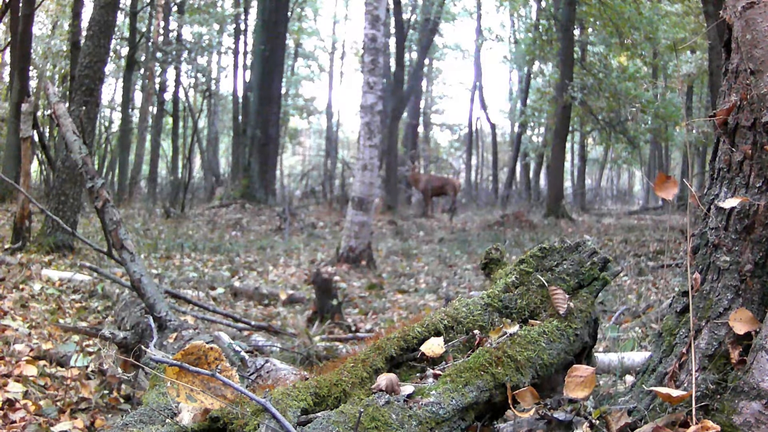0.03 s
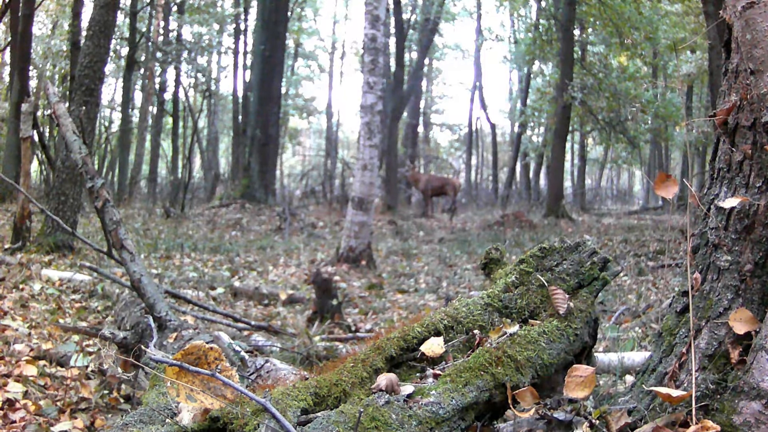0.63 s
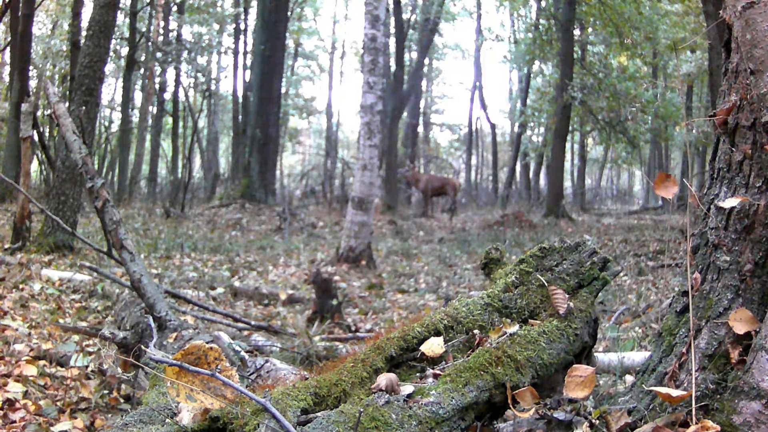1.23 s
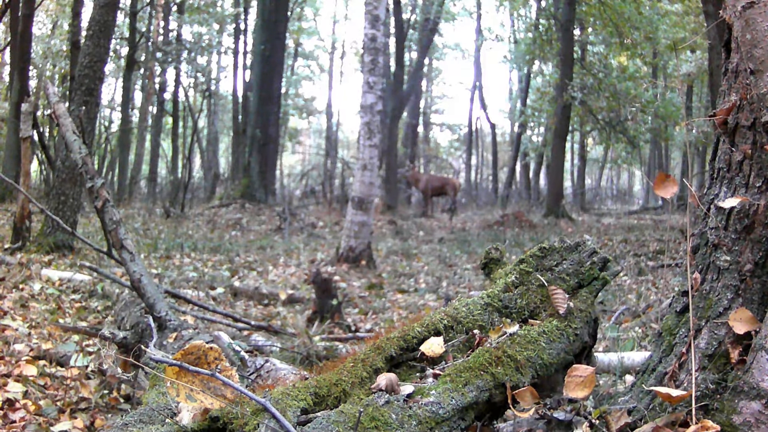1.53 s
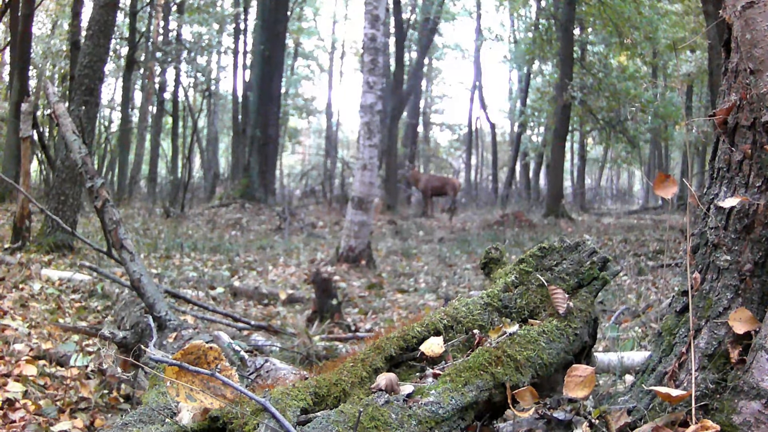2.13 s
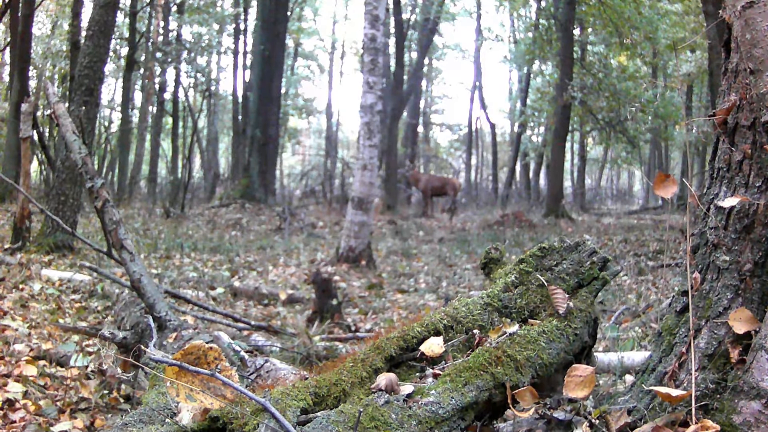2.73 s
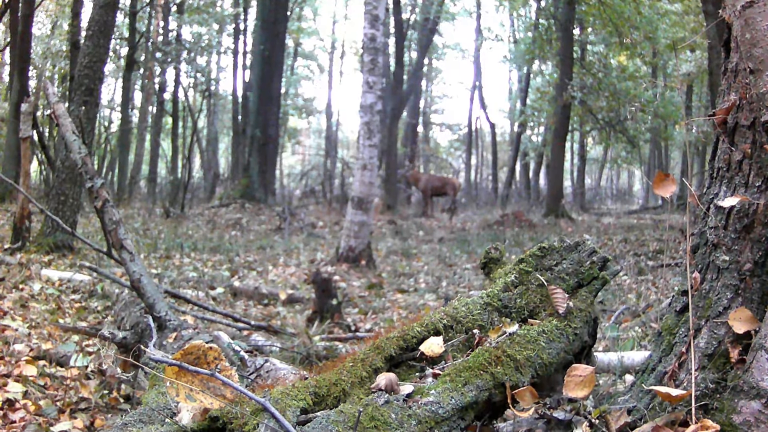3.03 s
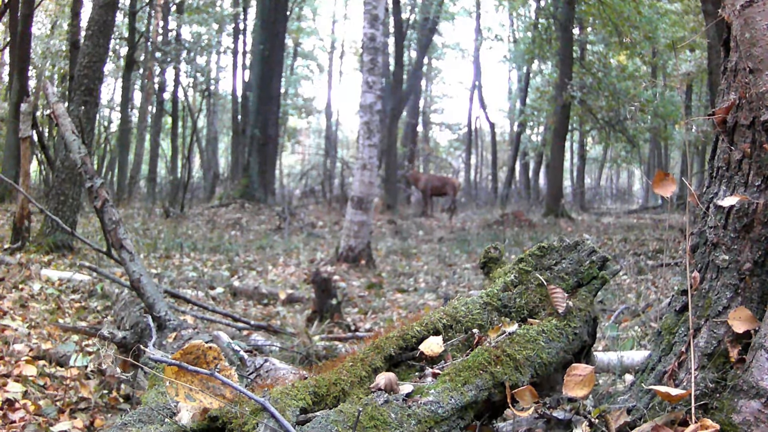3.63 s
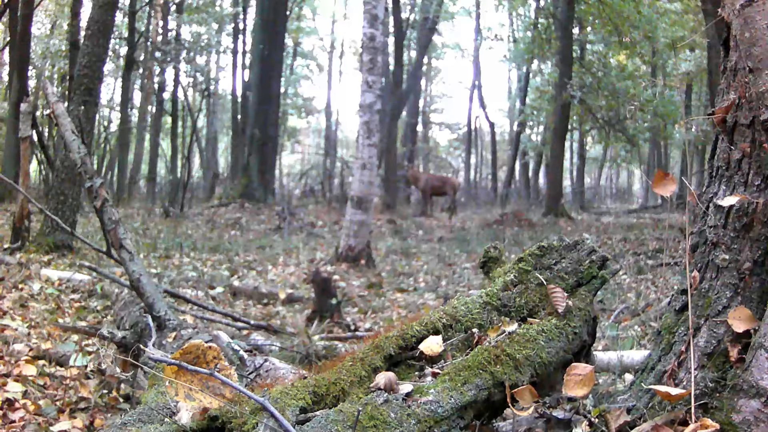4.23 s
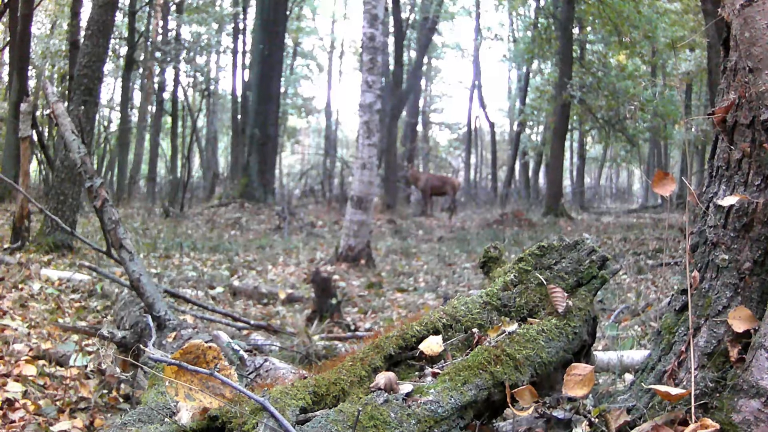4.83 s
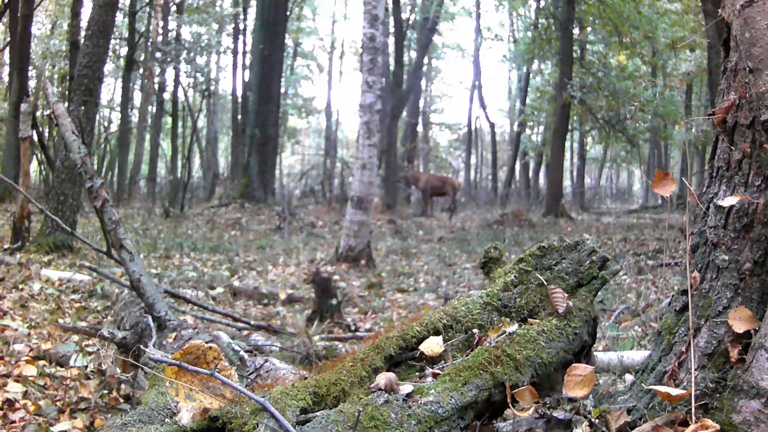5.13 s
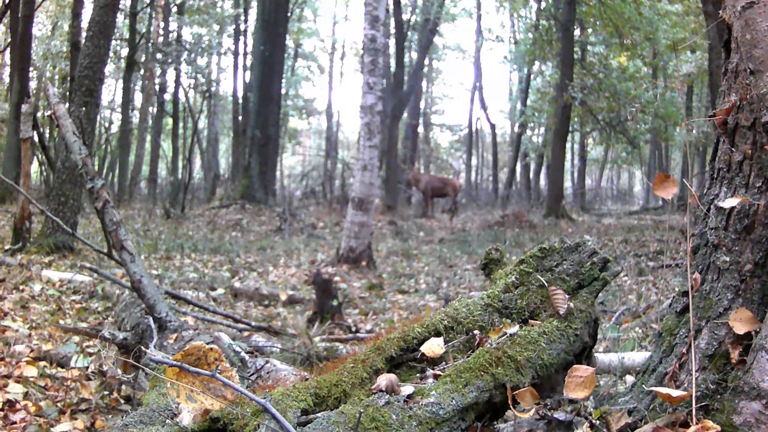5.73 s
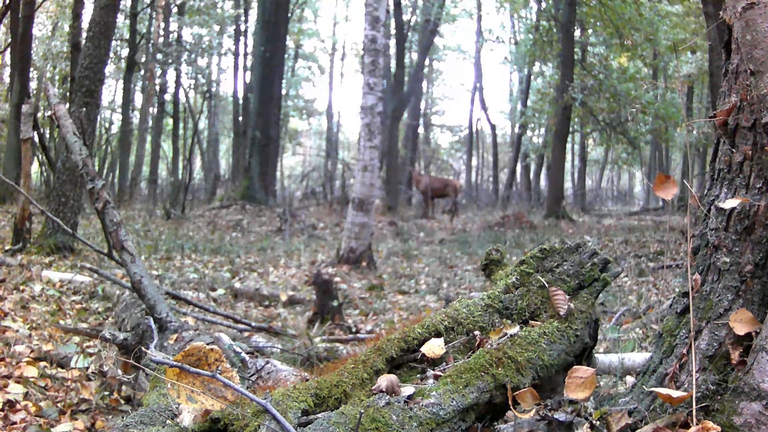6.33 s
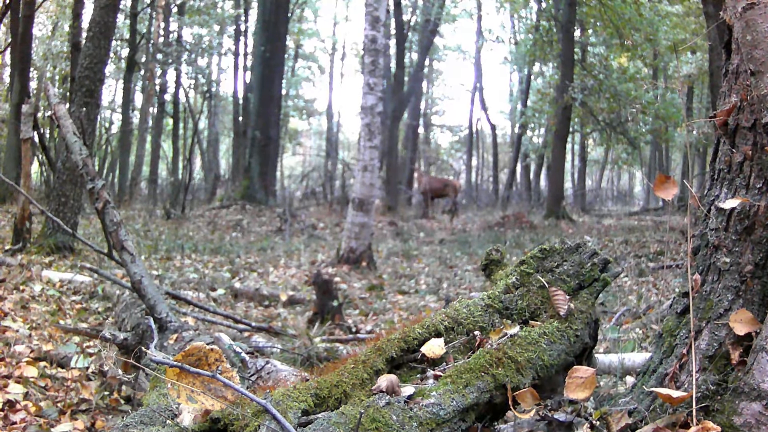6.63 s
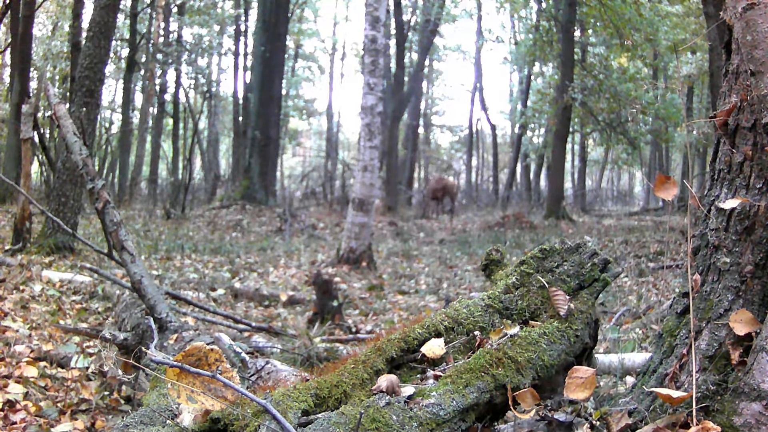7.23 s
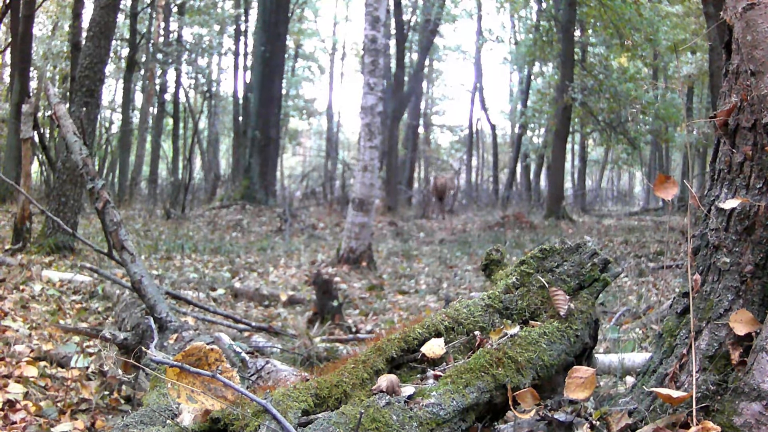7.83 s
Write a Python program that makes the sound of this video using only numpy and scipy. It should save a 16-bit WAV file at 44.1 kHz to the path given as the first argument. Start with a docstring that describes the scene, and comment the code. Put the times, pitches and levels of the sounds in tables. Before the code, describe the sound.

In still woodland, a distant stag gives a long, deep roar and then a shorter, rougher one, each with a short echo. Soft bumps on the camera body come as the second call fades. After a lull with one small dry snap, five sharp, close taps ring the housing, the first the loudest. Under everything the microphone picks up low air, fine hiss and the camera's faint, fluttering motor hum.

```python
"""Stag roaring in the forest

A red deer stag roars twice among distant trees: one long, level call, then a short, hoarser one that
arches in pitch. Its vocal folds pulse through a throat that shifts posture, and the trunks scatter it.
A faint click falls in the second roar. Light bumps and later five sharp taps ring the camera's housing,
with a few faint snaps. Its tape drive hums and ticks throughout, over still air and a soft hiss."""
import sys
import numpy as np
from scipy import signal
from scipy.fft import rfft, irfft, next_fast_len
from scipy.io import wavfile
from scipy.ndimage import uniform_filter1d, map_coordinates

SR = 44100
rng = np.random.default_rng(int(sys.argv[2]) if len(sys.argv) > 2 else 0)


def digitize_waveform(pressure):
    """Quantize a signal to 16-bit integers and store it at the path in sys.argv[1].

    Rows of a 2-D input are taken as channels; values are limited to [-1, 1].
    """
    field = np.atleast_2d(pressure).T
    bounded = np.clip(field, -1, 1)
    quanta = np.round(bounded * 32767).astype(np.int16)
    wavfile.write(sys.argv[1], SR, quanta)


N = 352800
TIME = np.arange(N) / SR

# Pitch line of each roar: time_s, pitch_hz
LONG_ROAR_PITCH = [(0, 92.26), (.53, 80.9), (.75, 83.6), (.89, 82.65), (1, 84.1), (1.11, 86.6),
                   (1.25, 88.7), (1.51, 89.26), (1.7, 83.4)]
SHORT_ROAR_PITCH = [(2.14, 82.66), (2.3, 92.8), (2.46, 98.15), (2.485, 102.2), (2.53, 100.5), (2.67, 89.85),
                    (2.8, 83.5)]
# Throat resonances in five postures: centre_hz, width_hz, gain_db
THROAT_STRETCHED = [(520, 53, -3), (875, 79, 3.5), (1250, 71, 3.5), (1455, 71, 0), (1690, 73, 0.5),
                    (2110, 200, -15), (2506, 120, -8), (2865, 160, -8)]
THROAT_HELD = [(500, 60, -11.5), (940, 74, 6), (1276, 75, 6), (1545, 83, -4.5), (1739, 50, -1.5),
               (2135, 200, -8.5), (2540, 100, -9), (2760, 70, -9.5), (2970, 70, -13.5)]
THROAT_OPENING = [(1260, 190, -0.5), (1490, 160, 0), (1715, 110, 2), (2070, 120, 0.5), (2600, 180, -21),
                  (2760, 170, -8), (3100, 180, -15)]
THROAT_FULL = [(970, 150, -8), (1320, 190, 0), (1623, 60, 3), (2015, 140, 2), (2370, 190, -16),
               (2750, 300, -12.5), (3080, 180, -13)]
THROAT_CLOSING = [(970, 130, -5), (1330, 120, 3), (1610, 80, 1), (1930, 150, 3), (2300, 160, -11.5),
                  (2720, 220, -13), (3020, 180, -15)]
# Crossfades from each posture to the next: start_s, end_s
POSTURE_FADES = [(.4, .65), (1.8, 2), (2.44, 2.49), (2.52, 2.63)]

def stag(jitter=0.0003, rough_jitter=.012, shimmer_db=.6, chest_db=-2):
    """Vocal folds snap shut once a cycle; when hoarse they stumble and let through turbulent puffs."""
    pitch = np.interp(TIME, *np.transpose(LONG_ROAR_PITCH + SHORT_ROAR_PITCH))
    loudness, rough = roar_shape()
    hoarse = np.clip(rough, 0, 1) ** 2.5
    cycles = np.cumsum(pitch * (1 + (jitter + rough_jitter * hoarse) * wobble(70))) / SR
    offset = cycles % 1 - .5
    pulses = unit(np.sinc(offset / pitch * SR / 4) * np.cos(np.pi * offset) ** 2)
    puffs = unit(rng.standard_normal(N) * np.exp(-(offset / 0.3) ** 2))
    folds = (np.sqrt(1 - hoarse) * pulses + np.sqrt(hoarse) * puffs) * amp(shimmer_db * wobble(45))
    voice = throat(folds, THROAT_STRETCHED)
    postures = (THROAT_HELD, THROAT_OPENING, THROAT_FULL, THROAT_CLOSING)
    for (start, end), posture in zip(POSTURE_FADES, postures):
        blend = ramp(start, end - start)
        voice = (1 - blend) * voice + blend * throat(folds, posture)
    power = np.abs(uniform_filter1d(voice ** 2, size=SR // 12))
    voice /= np.sqrt(power + 1e-9)  # even out the level ahead of the envelope
    chest = amp(chest_db) * np.sin(4 * np.pi * cycles)  # the second harmonic gives the roar its weight
    return (voice + chest) * loudness


# The two roars: start_s, end_s, release_s, level_db, settled_roughness (0-1), final_roughness (0-1)
ROAR_CUES = [(-.3, 1.68, .06, -49, .1, .75), (2.135, 2.84, .12, -49, .1, .35)]
# Brief swells in loudness within a roar: start_s, end_s, boost_db
ROAR_SWELLS = [(.27, .37, 2.2), (.7, .83, 2.3), (1.04, 1.13, 2.8), (1.57, 1.65, 4), (2.45, 2.76, 3)]

def roar_shape(attack_s=.037, onset_rough=.72, settle_s=.16, break_lead_s=.18, break_rise_s=.09):
    """Loudness and roughness: a roar starts hoarse, the folds lock in, then it breaks up and fades."""
    loudness, rough = np.zeros(N), np.zeros(N)
    for start, end, release_s, db, settled, final in ROAR_CUES:
        loudness += amp(db) * envelope(start, end, attack_s, release_s)
        onset = onset_rough * (1 - ramp(start, settle_s))
        breakup = (final - settled) * ramp(end - break_lead_s, break_rise_s)
        rough = np.where(TIME >= start, settled + onset + breakup, rough)
    swell_db = sum(db * envelope(start, end, attack_s=.03, release_s=.03)
                   for start, end, db in ROAR_SWELLS)
    return loudness * amp(swell_db), rough


def throat(source, modes, low_hz=600, high_hz=3150):
    """One posture's resonances shape the voice; little outside their band carries this far."""
    def response(f):
        peaks = sum(amp(db) * np.abs(resonance(f, hz, width)) ** 2 for hz, width, db in modes)
        low_cut = (f / low_hz) ** 2 / np.hypot(1, (f / low_hz) ** 2)
        high_cut = amp(-23) + 1 / (1 + (f / high_hz) ** 20)
        return peaks * low_cut * high_cut
    return unit(filtered(source, response))


# Reverb time among the trees: frequency_hz, t60_s
FOREST_DECAY = [(300, 1.4), (1500, 0.95), (3000, 0.46), (10000, 0.48)]

def forest(call, build_s=0.0075):
    """Trunks scatter the call into a tail that builds up briefly and loses its treble first."""
    hz, t, spectrum = signal.stft(rng.standard_normal(SR * 3 // 2), SR, nperseg=256)
    decay = amp(-60 * t / along(FOREST_DECAY, hz)[:, None])
    build = 1 - np.exp(-t / build_s)
    tail = signal.istft(spectrum * decay * build, SR, nperseg=256)[1]
    return signal.fftconvolve(call, unit(tail))[:N] / np.sqrt(len(tail))


# Modes of the camera housing: centre_hz, width_hz, gain_db
HOUSING_MODES = [(128, 25.5, 25), (153.6, 27.6, 26), (181, 4, 32.5), (259.3, 16.3, 24), (296.5, 9.7, 25),
                 (390, 19, 3), (550, 22, 16), (740, 38, 26), (847, 110, 20), (960, 74, 17.5),
                 (1157, 58, 22.5), (1410, 225, 19), (1660, 130, 16.5), (1895, 260, 19), (2350, 120, 15.5),
                 (2700, 250, 11), (3200, 69, 15), (4130, 70, 12), (4980, 210, 7.5), (6300, 260, 17.5),
                 (7400, 180, 4.5), (9100, 720, 6)]
# A faint, sharp broadband click during the second roar, then bumps and taps on the housing:
# start_s, strength_db, relative_crack_db, length_s
TRANSIENT_CUES = [(2.473, -28, -8, .0007), (2.67, -24, -38, .012), (2.888, -26, -43, .008),
                  (3.085, -18.5, -43, .01), (3.252, -20, -39, 0.01226), (3.441, -20.5, -39, .007),
                  (3.717, -18.5, -43, .006), (6.3889, -0.15, -24.5, .0012), (6.615, -11, -49, 0.0012),
                  (6.8895, -11, -43, 0.0012), (7.441, -5, -40, .0005), (7.883, -7.5, -43.5, .00066)]
# Faint dry snaps: start_s, level_db, cutoff_hz, length_s
SNAP_CUES = [(0.146, -54, 10000, .005), (5.153, -25, 2300, .008), (6.43, -44, 10000, .008)]

def knocks_and_clicks(split_hz=450, thump_hz=315, ring_from_hz=480, contact_hz=2776, db_per_octave=13.5):
    """A knock thumps the camera and rings its shell; the click comes with a bright broadband edge, a snap only
    rings."""
    size, lead = SR // 2, SR // 100
    f = np.fft.rfftfreq(size, 1 / SR)
    body = sum(amp(db) * resonance(f, hz, width) for hz, width, db in HOUSING_MODES if hz < split_hz)
    body *= lowpass(f, thump_hz)
    shell = sum(amp(db) * resonance(f, hz, width) for hz, width, db in HOUSING_MODES if hz >= split_hz)
    shell *= 1j * f / (ring_from_hz + 1j * f)  # the small shell radiates little bass
    transients = []
    for start, db, crack_db, length_s in TRANSIENT_CUES:
        thump = amp(2 + 0.44 * db) * body  # grows more slowly with strength than the ring
        cutoff_hz = contact_hz * 2 ** (db / db_per_octave)  # harder knocks reach higher modes
        ring = amp(db) * shell * (lowpass(f, cutoff_hz) + amp(crack_db))
        transients.append((start, thump + ring, length_s))
    for start, db, cutoff_hz, length_s in SNAP_CUES:
        transients.append((start, amp(db) * shell * lowpass(f, cutoff_hz), length_s))
    out = np.zeros(N + SR)
    edge_fades = signal.windows.tukey(size, lead / size)
    for start, spectrum, length_s in transients:
        sound = irfft(spectrum * smear(f, length_s, step_hz=295.5), size)  # roughens the attack
        out[round(start * SR) - lead:][:size] += np.roll(sound, lead) * edge_fades
    return out[:N]


# Partials of the drive's hum: frame_rate_multiple, level_db
HUM_PARTIALS = [(1, -55), (2, -54.5), (3, -51), (4, -38.5), (5, -47.5), (7, -62.5), (8, -59), (9, -50.5),
                (10, -53.5), (11, -56.5), (12, -58), (13, -59.5), (15, -63), (17, -60.5), (18, -63.5),
                (20, -66), (23, -64), (27, -71.5)]
# Ticks that repeat every second frame: first_s, width_s, level_db
DRIVE_TICKS = [(.0243, 0.00075, -34.5), (0.021, .0003, -51), (0.053, 0.00054, -33.5), (.0618, 0.00029, -40)]
# Tone of the whirr: frequency_hz, density_db
WHIRR_SPECTRUM = [(150, -20), (350, 1), (700, 1), (1200, -5.5), (2400, -18.5), (4000, -40), (6000, -60)]

def tape_drive(frame_hz=30.028, hum_db=-1, whirr_db=-56, waver_db=.5):
    """The drive hums on multiples of the frame rate, ticks as it steps and whirrs in fast bursts."""
    angle = 2 * np.pi * frame_hz * (TIME - DRIVE_TICKS[0][0])
    hum, ticks = np.zeros(N), np.zeros(N)
    for order, db in HUM_PARTIALS:
        # low orders lock to the step; the fifth opposes the third, so the hum flutters but hardly throbs
        phase = rng.uniform(0, 2 * np.pi) if order > 5 else np.pi * (order == 5)
        hum -= np.sqrt(2) * amp(db + waver_db * wobble(5)) * np.cos(order * angle + phase)
    period_s = 2 / frame_hz
    for first_s, width_s, db in DRIVE_TICKS:
        from_tick_s = (TIME - first_s + period_s / 2) % period_s - period_s / 2
        ticks -= amp(db) * np.exp(-.5 * (from_tick_s / width_s) ** 2)
    bursts = np.exp(.5 * np.cos(8 * angle))  # eight a frame
    whirr = unit(bursts * noise(WHIRR_SPECTRUM))
    return amp(hum_db) * hum + ticks - ticks.mean() + amp(whirr_db) * whirr


def sheen(x, level_db=-26, low_hz=1000, high_hz=3500, mirror_hz=16000):
    """A faint glassy edge: the midrange mirrored into the top of the treble."""
    mids = filtered(x, lambda f: lowpass(f, high_hz) * (f / np.hypot(f, low_hz)) ** 3)
    return amp(level_db) * mids * np.cos(2 * np.pi * mirror_hz * TIME)


# Tone of the two noise beds: frequency_hz, density_db
AIR_SPECTRUM = [(12, -4.5), (25, 2.5), (60, -6), (130, -1.5), (200, -5.5), (300, -10.5), (450, -11.5),
                (700, -21.5), (1000, -25.5), (1600, -26), (2300, -26.5), (3200, -35), (4500, -56),
                (6000, -78.5)]
HISS_SPECTRUM = [(2060, -24), (3500, -1), (4040, -5.5), (5020, -11.5), (5760, -6), (6770, -4), (8010, -9.5),
                 (9300, -9.5), (11200, -22.5), (12900, -18), (15500, -29.5)]

def air_and_hiss(air_db=-48.5, hiss_start_db=-81, hiss_rise_db_per_s=1.29):
    """A low bed of still forest air, and a fine hiss that slowly grows."""
    air = amp(air_db + 0.25 * wobble(1.2)) * noise(AIR_SPECTRUM)
    hiss = amp(hiss_start_db + hiss_rise_db_per_s * TIME) * noise(HISS_SPECTRUM)
    return air + hiss


def amp(db):
    """Decibels to gain."""
    return 10 ** (np.asarray(db) / 20)


def unit(x):
    """x at rms 1."""
    return x / np.sqrt(np.mean(x ** 2) + 1e-20)


def along(points, hz):
    """A curve of (frequency_hz, value) points, read on a log frequency axis."""
    point_hz, values = np.transpose(points)
    return np.interp(np.log(hz + 1), np.log(point_hz + 1), values)


def ramp(start, length_s):
    """0 until start, then a straight rise to 1."""
    return np.clip((TIME - start) / length_s, 0, 1)


def envelope(start, end, attack_s, release_s):
    """Attack, hold at 1, and a release that reaches 0 at the end."""
    return ramp(start, attack_s) * (1 - ramp(end - release_s, release_s))


def wobble(rate_hz):
    """A smooth random curve with rate_hz knots a second."""
    return map_coordinates(rng.standard_normal(int(N * rate_hz / SR) + 4), [TIME * rate_hz])


def filtered(x, response):
    """x through a complex frequency response."""
    size = next_fast_len(len(x) + SR // 2)
    return irfft(rfft(x, size) * response(np.fft.rfftfreq(size, 1 / SR)), size)[:len(x)]


def noise(spectrum):
    """Coloured noise of rms 1."""
    return unit(filtered(rng.standard_normal(N), lambda hz: amp(along(spectrum, hz))))


def resonance(f, centre, width):
    """A causal resonance with gain 1 at its centre."""
    return 1j * f * width / (centre ** 2 - f ** 2 + 1j * f * width)


def smear(f, spread_s, step_hz):
    """An all-pass that delays each frequency by a random share of spread_s."""
    knots = np.arange(0, SR / 2 + step_hz, step_hz)
    delay_s = np.interp(f, knots, np.resize(rng.uniform(0, spread_s, 512), len(knots)))
    return np.exp(-2j * np.pi * np.cumsum(delay_s) * f[1])


def lowpass(f, cutoff_hz):
    """A causal four-pole low-pass response."""
    return signal.freqs(*signal.butter(4, 1, analog=True), f / cutoff_hz)[1]


def scene():
    """The far stag, blurred by many paths between the trunks, and the near sounds of the camera."""
    call = filtered(stag(), lambda f: smear(f, spread_s=.01, step_hz=118.8))
    events = amp(-2) * call + amp(-7.5) * forest(call) + knocks_and_clicks()
    return (events + sheen(events) + tape_drive() + air_and_hiss())[None]


def record(dry, top_hz=15700):
    """The camera keeps nothing above its band limit."""
    return np.array([filtered(channel, lambda hz: hz < top_hz) for channel in dry])


dry = scene()
out = record(dry)
digitize_waveform(out)
```